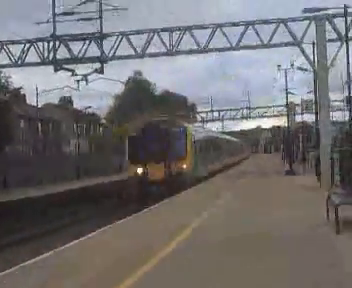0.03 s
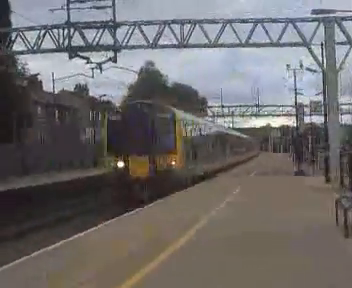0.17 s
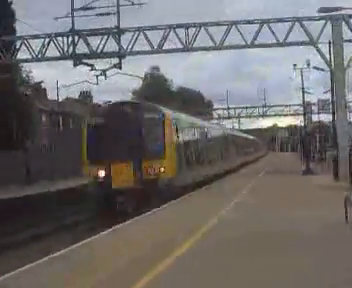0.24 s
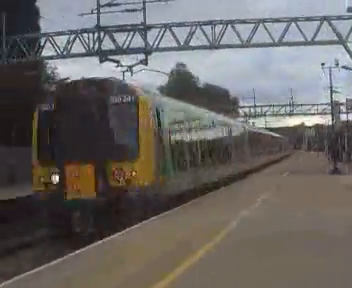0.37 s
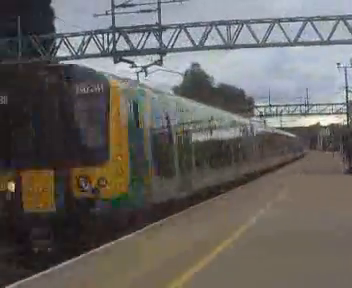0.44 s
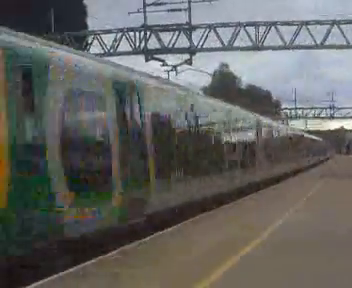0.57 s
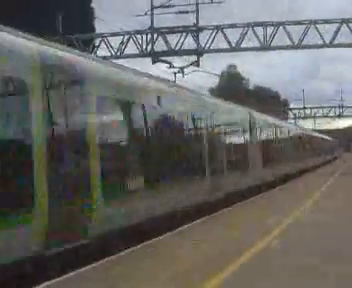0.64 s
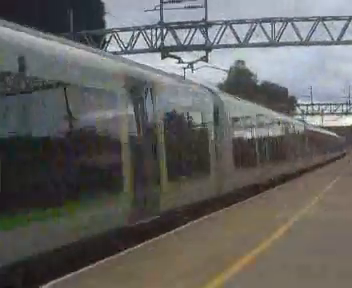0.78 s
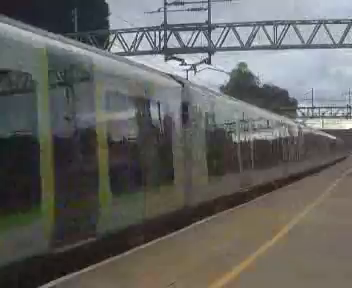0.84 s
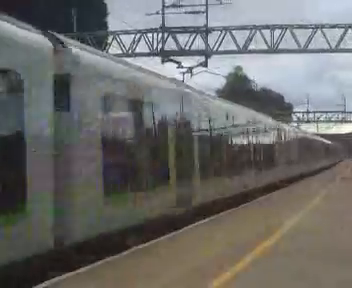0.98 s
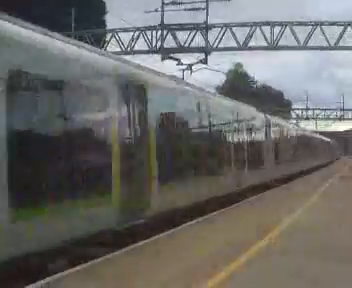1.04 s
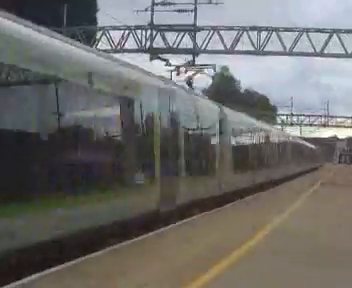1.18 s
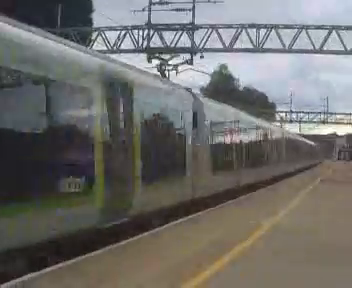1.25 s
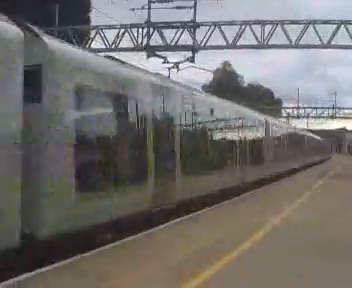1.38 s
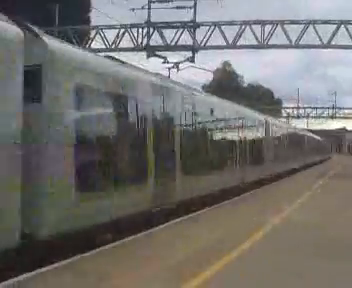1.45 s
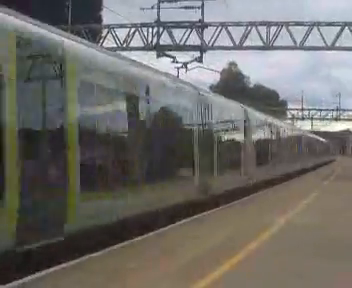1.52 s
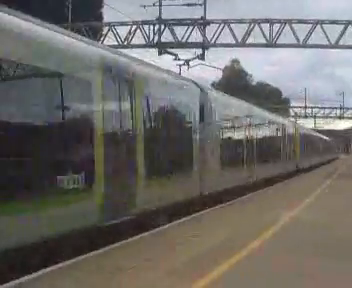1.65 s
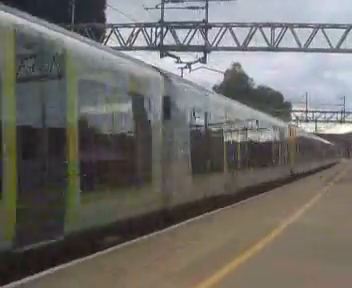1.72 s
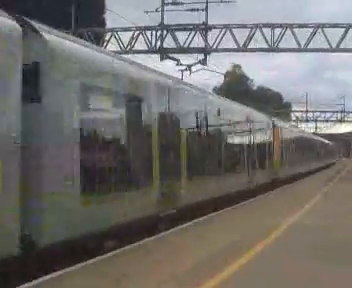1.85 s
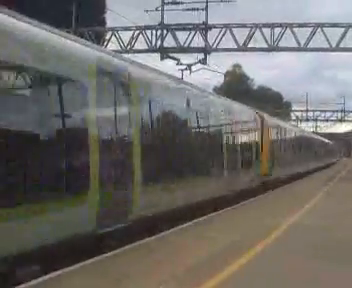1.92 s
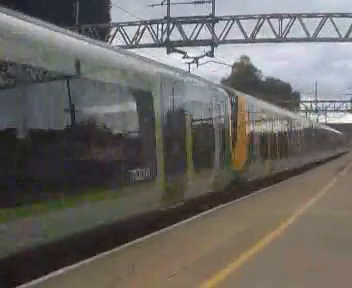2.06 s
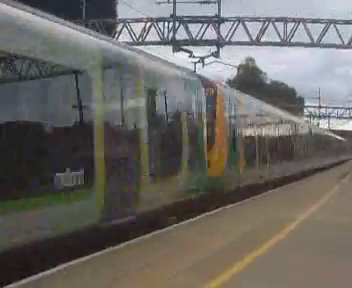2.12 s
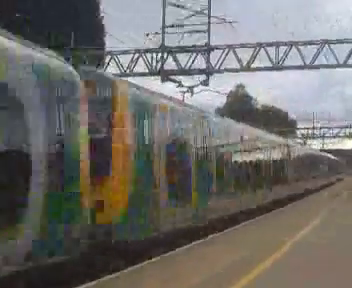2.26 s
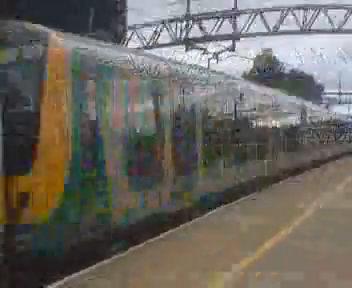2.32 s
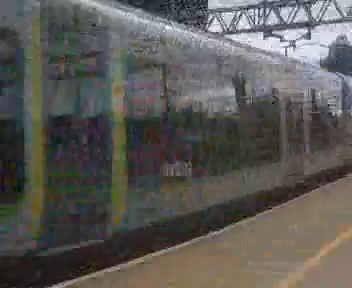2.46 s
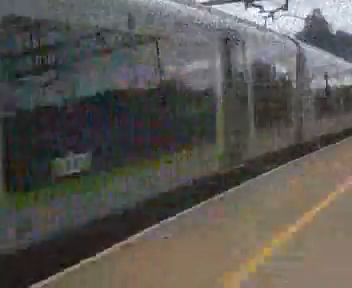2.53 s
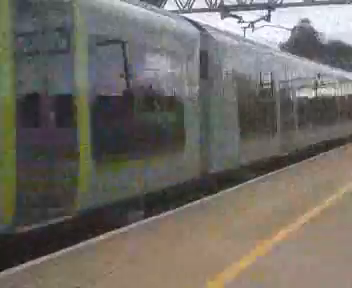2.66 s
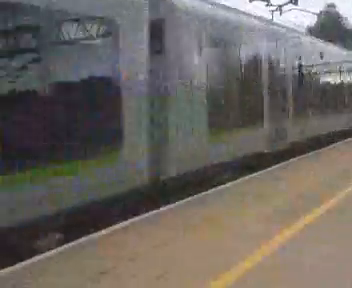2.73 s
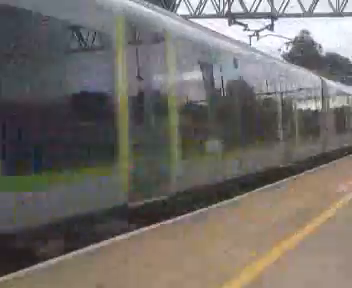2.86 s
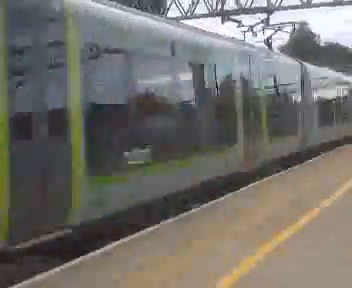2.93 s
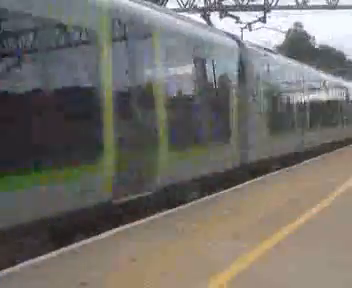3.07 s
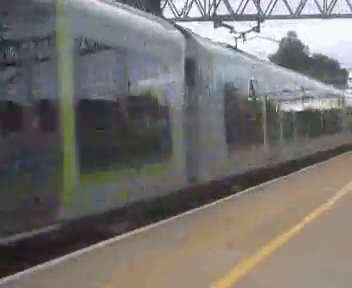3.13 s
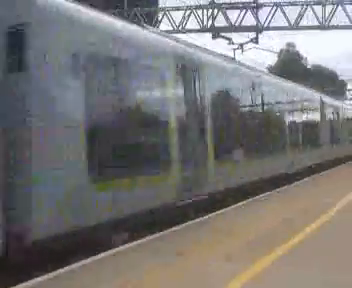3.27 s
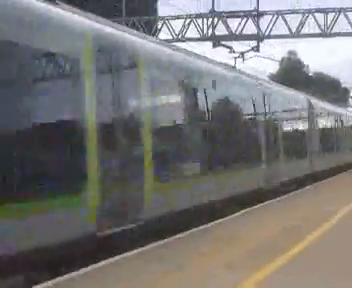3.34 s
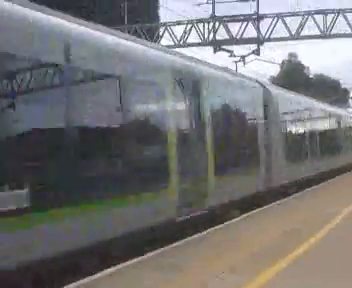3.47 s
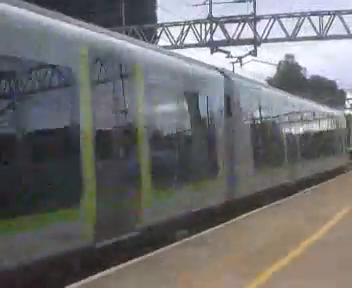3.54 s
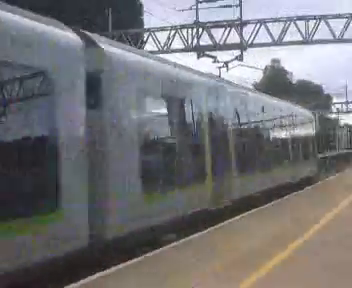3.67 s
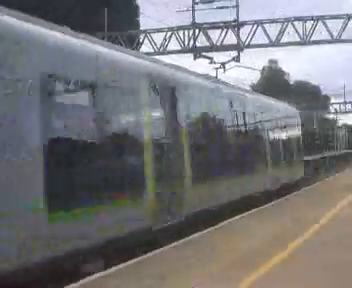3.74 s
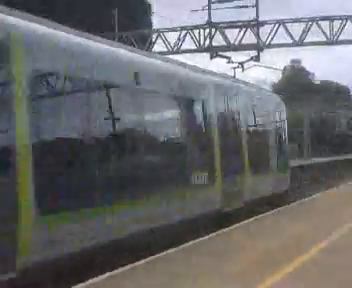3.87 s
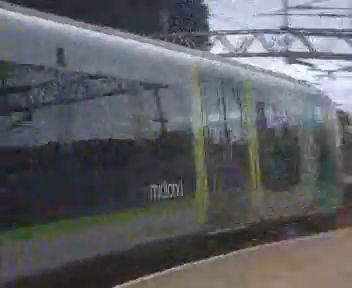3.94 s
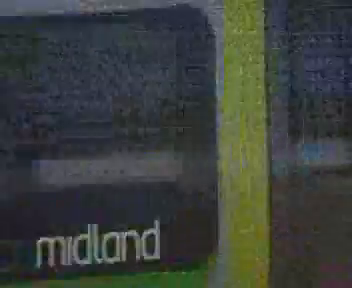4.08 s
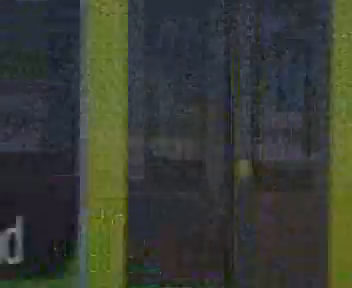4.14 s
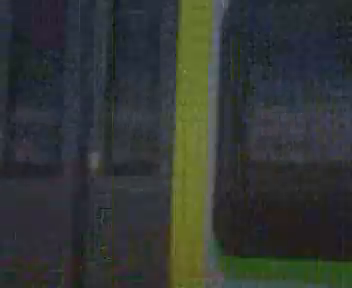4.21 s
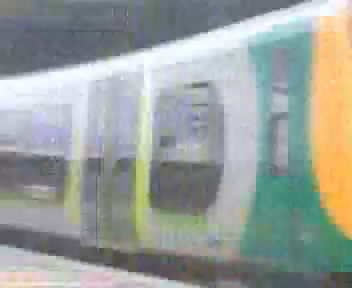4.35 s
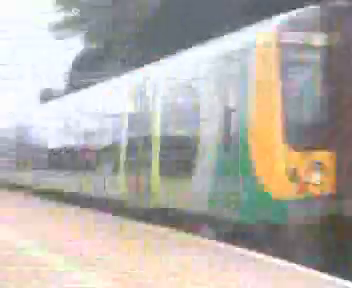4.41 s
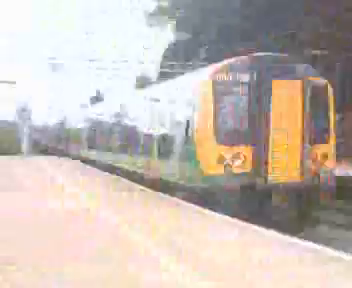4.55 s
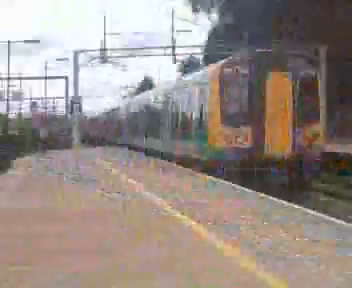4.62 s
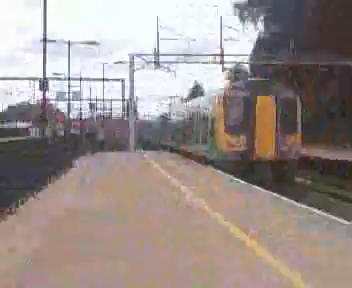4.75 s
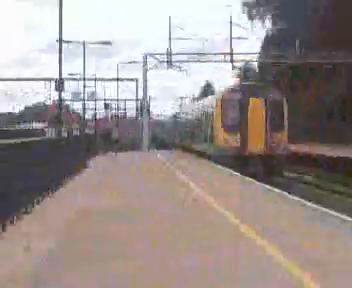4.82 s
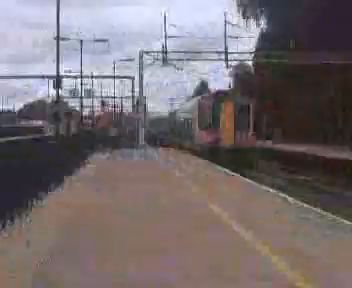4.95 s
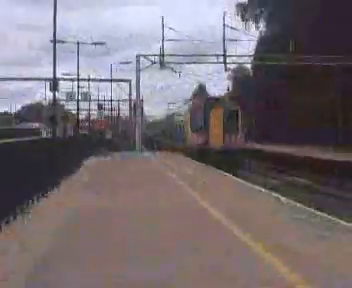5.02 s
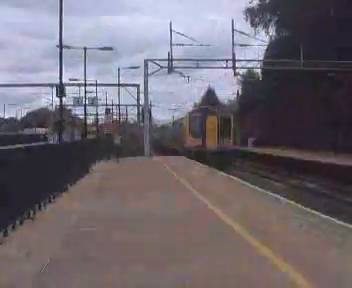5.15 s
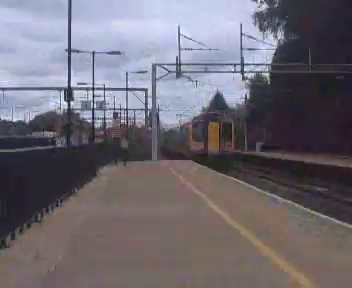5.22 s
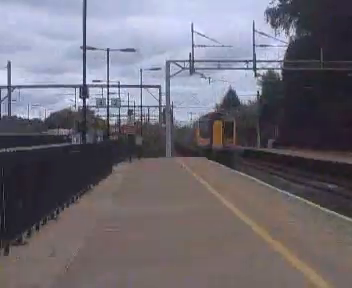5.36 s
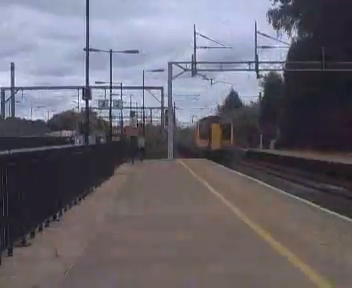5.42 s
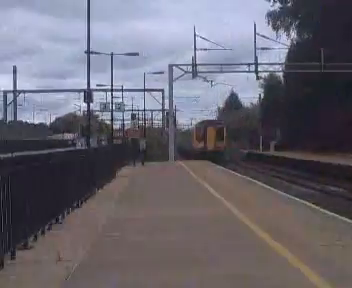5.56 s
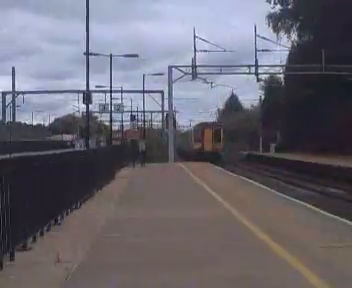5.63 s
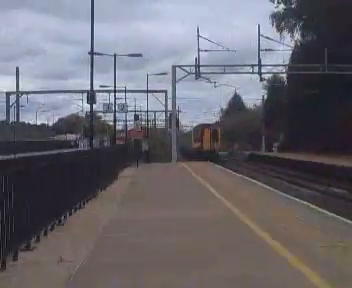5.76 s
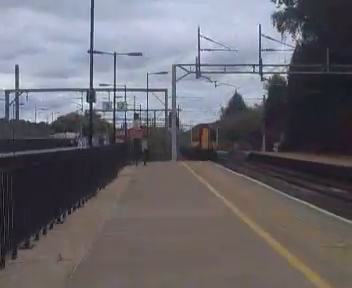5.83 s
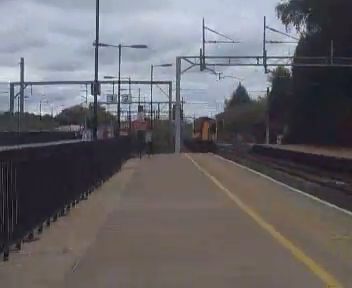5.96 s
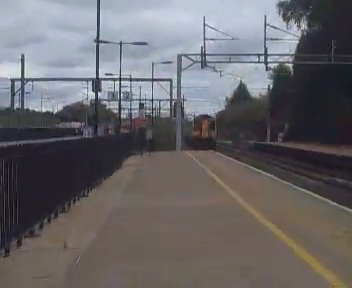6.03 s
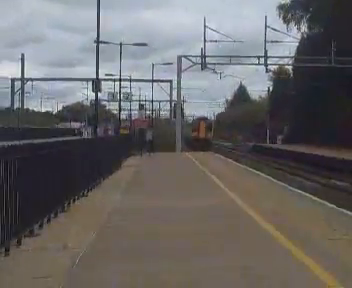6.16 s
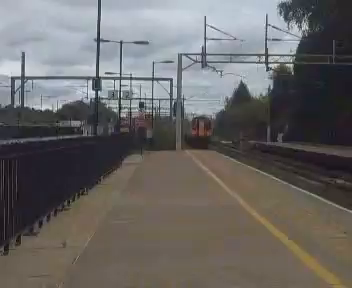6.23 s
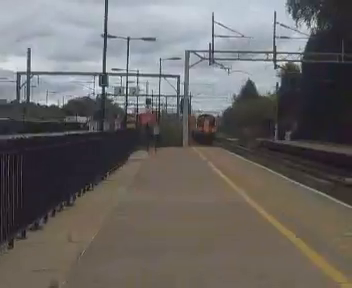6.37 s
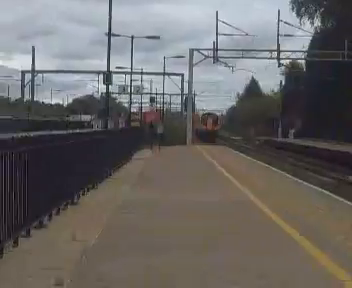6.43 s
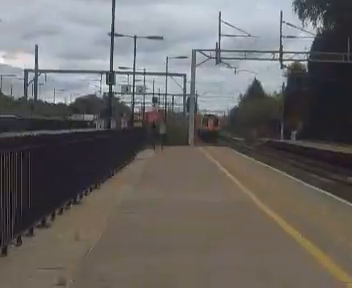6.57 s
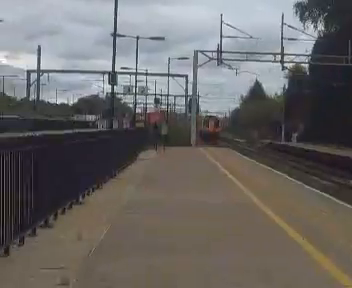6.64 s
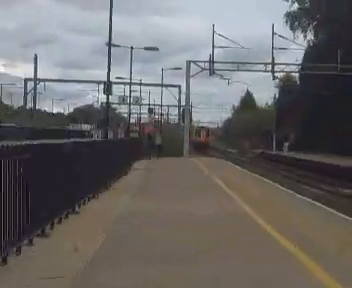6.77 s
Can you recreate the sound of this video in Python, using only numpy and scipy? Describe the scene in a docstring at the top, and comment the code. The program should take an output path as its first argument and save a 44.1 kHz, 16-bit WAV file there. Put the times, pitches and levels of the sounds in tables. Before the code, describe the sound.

From the first instant a fast electric train is close and loud at an open station: a high, blurred metallic ring around 2.4 kHz, hiss, rail drone and a mid-pitched motor whine. At about 0.5 s the front bursts past with a blast of low buffeting air and harsh microphone overload, until about 0.7 s; the whine drops away. From 0.8 to 4.2 s the cars stream by, ringing slightly lower and sagging, with uneven surges of wheel noise and hiss near 1.1, 1.6, 2.1, 2.5, 3.5 and 3.9 s, and faint narrow motor whines between. Around the join of the two units, near 2.5 s, there is another stronger surge. After about 4.3 s the tail is gone: the ring falls flat, near 1.8 kHz, clearer and fluttering, over a distant roar and a brief low rumble. It thins steadily, becoming faint by 6.8 s. The sound is narrow-band, with little high treble.

```python
"""An open station: a fast electric train of two coupled units runs through, a few metres from the listener.
Noise rings the steel wheels' modes: sharp while they come, flat once they have gone.
Bands of flickering noise make the rail drone, the air buffeting past each car, hiss, roar and rumble.
Narrow resonances make the motors' whine. A narrow-band microphone overloads on the loudest peaks.
"""
import sys
import numpy as np
from scipy import signal
from scipy.fft import rfft, irfft, next_fast_len
from scipy.io import wavfile
from scipy.ndimage import map_coordinates

SR = 44100
rng = np.random.default_rng(int(sys.argv[2]) if len(sys.argv) > 2 else 0)


def unload_audio(sound):
    """Save the sound as a 16-bit wav file, at the path given as the first command line argument."""
    columns = np.transpose(np.atleast_2d(sound))
    # keep every value between -1 and 1, then stretch to whole-number steps
    steps = np.round(np.clip(columns, -1, 1) * 32767)
    wavfile.write(sys.argv[1], SR, steps.astype(np.int16))


N = 299439

# Ways a wheel rings at rest, before blurring: pitch_hz, width_hz, level_db
WHEEL_MODES = [(1150, 59, -15), (1468, 72, -12), (2009.6, 38, 1), (2199, 84, 2), (2570, 300, -7.5),
               (2935, 560, -6.5)]
# The next six shape noise, by level in each Hz of pitch: pitch_hz, level_db
# Air pushed aside by the cars: pitch_hz, level_db
AIR_SPECTRUM = [(12, -53.5), (20, -30.5), (65, -14), (140, -9), (205, -9.5), (295, -7), (352, -3.5),
                (461, -7), (567, -7.5), (665, -3), (900, -8.5), (1170, -28.5), (1980, -120)]
# Droning rails: pitch_hz, level_db
RAIL_SPECTRUM = [(450, -17), (650, -13), (900, -6.5), (1250, -4.5), (1500, -4.5), (1800, -7), (2300, -1.5)]
# Hiss above the wheel ring: pitch_hz, level_db
HISS_SPECTRUM = [(2000, -20.5), (2600, -8), (3000, -3), (3300, 3), (3600, 5), (4000, 1), (4400, 0.5),
                 (5400, -5)]
# Distant roar; the dip is where the platform's reflection cancels the direct sound: pitch_hz, level_db
FAR_ROAR_SPECTRUM = [(450, -24.5), (700, -10), (900, 0.5), (1200, 0), (1380, -11), (1600, 0.5), (2100, -2),
                     (2600, 2), (3000, -22), (4000, -22)]
# Ground rumble: pitch_hz, level_db
RUMBLE_SPECTRUM = [(25, -16.5), (50, -4), (90, 6.5), (150, -6.5), (315, 7.5), (450, -17.5)]
# How strongly the microphone passes each pitch: pitch_hz, level_db
MICROPHONE_RESPONSE = [(3300, 0), (3600, -9), (3900, -17), (4250, -24), (4450, -36), (4600, -52),
                       (4690, -110)]
# The whole train, between the bogies (wheel sets):
# start_s, wheels_coming_db, wheels_alongside_db, rail_drone_db, buffeting_db, hiss_db
TRAIN_LEVELS = [(0.0, -11, -20.5, -21, -25, -17.5), (0.15, -11.5, -26, -26, -24.5, -21),
                (0.42, -10, -26, -15, -23.5, -14.5), (0.78, -17.5, -16, -21, -25.5, -19),
                (1.0, -25.5, -15, -23.5, -45, -22), (1.45, -24, -16.5, -34.5, -35.5, -23),
                (1.9, -23.5, -24.5, -27, -39, -21.5), (2.4, -33, -28, -31, -36.5, -36.5),
                (2.85, -29.5, -25.5, -29.5, -38, -32), (3.2, -36.5, -23, -41.5, -46, -40),
                (3.36, -50.5, -22, -37, -40, -34.5), (3.75, -34.5, -26, -27.5, -41, -27),
                (4.3, -21.5, -22.5, -36, -42, -33), (4.5, -59.5, -25, -35, -42, -34),
                (4.9, -82, -31, -46, -50, -36.5), (5.1, -90.5, -63, -82, -58, -46),
                (6.07, -92.5, -94, -95, -59.5, -50), (6.79, -90, -90.5, -89, -58.5, -58)]
# Bogies and car gaps level with the listener:
# start_s, held_s, wheels_coming_db, wheels_alongside_db, rail_drone_db, buffeting_db, hiss_db
BOGIE_PASSES = [(0.498, .2, -15, -14.5, -12, -17.5, -10), (0.84, 0.031, -23, -15, -31, -26, -19),
                (1.089, 0.072, -19, -18, -24, -25.5, -19.5), (1.189, 0.022, -19, -17.5, -29, -33.5, -20),
                (1.32, 0.036, -27, -19.5, -28, -32, -18.5), (1.599, 0.14, -19.5, -18.5, -36.5, -33, -19.5),
                (1.981, 0.013, -21.5, -27.5, -38, -42, -23.5), (2.119, 0.17, -22, -21, -37.5, -51, -21.5),
                (2.42, 0.11, -23.5, -27.5, -30.5, -31.5, -34.5),
                (2.51, 0.18, -18.5, -18.5, -29.5, -38.5, -20.5), (2.95, 0.073, -26.5, -23.5, -45, -34, -24),
                (3.13, 0.017, -28.5, -23, -52, -57, -24), (3.499, 0.11, -25, -22, -41.5, -38, -18.5),
                (3.902, 0.055, -14.5, -20.5, -23, -30.5, -19.5), (4.04, .05, -20, -18.5, -37.5, -33, -18),
                (4.249, 0.05, -34, -31, -25.5, -33, -32)]
# How fast each layer rises as a bogie nears, all in db_per_s:
# wheels_coming, wheels_alongside, rail_drone, buffeting, hiss
BOGIE_RISE = (118.6, 88.2, 101, 130, 150)
# How fast each layer falls afterwards, same columns, in db_per_s
BOGIE_FALL = (134, 80, 111, 160, 150)
# How much later each layer peaks (negative is earlier), same columns, in s
BOGIE_LAG = (-0.0054, .04, -0.0066, -.005, .015)
# Traction motors going by: start_s, held_s, level_db
MOTOR_PASSES = [(1.0, .05, -28), (1.499, 0.021, -33), (1.92, 0.038, -34), (2.41, .03, -32.5),
                (2.899, 0.03, -43), (3.301, 0.033, -35.5), (3.892, 0.034, -34), (4.26, 0.032, -35.5)]
# The tail drawing away: start_s, wheels_db, distant_roar_db, ground_rumble_db
LEAVING_LEVELS = [(4.32, -28, -28.5, -43), (4.7, -28, -31, -53), (4.95, -30.5, -34, -61),
                  (5.15, -33.5, -39.5, -74), (5.7, -36, -44, -82), (6.1, -40, -44.5, -69),
                  (6.3, -44.5, -46, -71), (6.4, -51.5, -46, -77), (6.79, -47.5, -48, -77)]

MACH = .138   # train speed over the speed of sound
MAIN_RING_HZ = 2100   # middle of the strongest wheel modes at rest
COMING_HZ, ALONGSIDE_HZ = 2428.5, 2087   # where that ring is heard, before it wanders
ALONGSIDE_SAG_HZ_PER_S = 28   # the ring sags as more cars draw away
WANDER_HZ, WANDER_RATE_HZ = 15, 6   # the ring wanders as wheels take turns
TAIL_FLUTTER_DB, TAIL_FLUTTER_RATE_HZ = 1.05, 16   # far sound flutters in the stirred air
OVERLOAD = .71   # largest wave height the microphone can carry
CUTOFF_HZ = 16100
STEP = 40   # slow changes are worked out at every 40th sample


def from_db(db):
    """Turn decibels into a gain."""
    return 10 ** (np.asarray(db) / 20)


def rms_one(x):
    """Scale a sound to an average strength (rms) of 1."""
    return x / np.sqrt(np.mean(x ** 2) + 1e-20)


def gains_in_time(rows, fade_s=0.28):
    """Join the dB points in each column by straight lines, fade beyond both ends, and turn into gains."""
    start_s, *columns = np.transpose(rows)
    t = np.arange(N) / SR
    wide_s = np.r_[start_s[0] - fade_s, start_s, start_s[-1] + fade_s]
    return [from_db(np.interp(t, wide_s, np.r_[-90, level_db, -90])) for level_db in columns]


def shaped(x, points):
    """Make each pitch louder or softer by a table of pitch and dB."""
    size = next_fast_len(N)   # a length that transforms quickly
    hz = np.maximum(np.fft.rfftfreq(size, 1 / SR), 1)
    at_hz, level_db = np.transpose(points)
    gain = from_db(np.interp(np.log(hz), np.log(at_hz), level_db))
    return irfft(rfft(x, size) * gain, size)[:N]


def drift(rate_hz):
    """Slow random wandering of spread 1: noise smoothed twice by the same low-pass."""
    r = np.exp(-2 * np.pi * rate_hz * STEP / SR)
    noise = rng.standard_normal(N // STEP + 2002)
    slow = signal.lfilter([1], [1, -2 * r, r * r], noise)[2000:]   # skip the settling
    return np.interp(np.arange(N) / STEP, np.arange(len(slow)), rms_one(slow))


def resonance(hz, width_hz):
    """Noise shaking one resonance, which rings near its own pitch; rms 1."""
    r = np.exp(-np.pi * width_hz / SR)
    ringing = [1, -2 * r * np.cos(2 * np.pi * hz / SR), r * r]
    return rms_one(signal.lfilter([1, 0, -1], ringing, rng.standard_normal(N)))


def rush(spectrum, patchy_db, flicker_rate_hz):
    """Roughly third-octave bands of noise that swell partly together, partly each on its own; rms 1."""
    low, high = spectrum[0][0], spectrum[-1][0]
    edges = np.geomspace(low, high, int(3 * np.log2(high / low)) + 2)
    white = rng.standard_normal((2, N))   # neighbouring bands take turns with two noises
    together = drift(flicker_rate_hz)
    out = 0
    for k, band in enumerate(zip(edges, edges[1:])):
        band_filter = signal.butter(2, band, "band", fs=SR, output="sos")
        noise = signal.sosfilt(band_filter, white[k % 2])
        out = out + noise * from_db(patchy_db * (0.53 * together + drift(flicker_rate_hz)))
    return rms_one(shaped(out, spectrum))


def swell(start_s, held_s, level_db, rise_db_per_s, fall_db_per_s):
    """Power of a level that climbs, holds and falls, at every 40th sample."""
    t = np.arange(0, N, STEP) / SR
    before_db = rise_db_per_s * np.maximum(start_s - t, 0)
    after_db = fall_db_per_s * np.maximum(t - start_s - held_s, 0)
    return from_db(level_db - before_db - after_db) ** 2


def to_gain(power):
    """Turn power at every 40th sample into a gain at every sample."""
    return np.interp(np.arange(N), np.arange(0, N, STEP), np.sqrt(power))


def passing_gains():
    """Gains of the five near layers: the whole train plus each bogie, added as powers."""
    gains = []
    for k, whole in enumerate(gains_in_time(TRAIN_LEVELS)):
        bogies = sum(swell(start_s + BOGIE_LAG[k], held_s, levels_db[k], BOGIE_RISE[k], BOGIE_FALL[k])
                     for start_s, held_s, *levels_db in BOGIE_PASSES)
        gains.append(np.hypot(whole, to_gain(bogies)))
    return gains


def wheels(doppler, blur, patchy_db):
    """Rail roughness keeps the wheels ringing; motion plays the ring faster or slower (Doppler)."""
    ring = 0
    for hz, width_hz, level_db in WHEEL_MODES:
        gain = from_db(level_db + patchy_db * drift(11.8))
        ring = ring + gain * resonance(hz, width_hz * blur)
    place = np.cumsum(doppler * np.ones(N))   # reading place in the ring, in samples
    return rms_one(map_coordinates(ring, [place], order=3, mode="mirror"))


def wheels_coming():
    """Approach squeezes the waves, so the ring is sharp; many wheels at slightly different angles blur it."""
    ring_hz = COMING_HZ + WANDER_HZ * drift(WANDER_RATE_HZ)
    return wheels(ring_hz / MAIN_RING_HZ, blur=2.9, patchy_db=1.0)


def wheels_alongside():
    """Blurred wheels beside the listener, sagging in pitch as more cars draw away."""
    sag_hz = ALONGSIDE_SAG_HZ_PER_S * np.arange(N) / SR
    ring_hz = ALONGSIDE_HZ - sag_hz + WANDER_HZ * drift(WANDER_RATE_HZ)
    return wheels(ring_hz / MAIN_RING_HZ, blur=2.98, patchy_db=1.92)


def rail_drone():
    """The rails drone as slowly flickering noise."""
    return rush(RAIL_SPECTRUM, patchy_db=2.8, flicker_rate_hz=4.9)


def motor_coming():
    """The first car's whine, a resonance heard sharper until the car is level, then dropping fast."""
    power = swell(0, held_s=.5, level_db=-23, rise_db_per_s=0, fall_db_per_s=255)
    return to_gain(power) * resonance(1547, width_hz=77)


def air_buffeting():
    """Air buffets past each car as mostly low, uneven noise."""
    return rush(AIR_SPECTRUM, patchy_db=1.7, flicker_rate_hz=13)


def hiss():
    """High noise with a quick flicker."""
    return rush(HISS_SPECTRUM, patchy_db=2.5, flicker_rate_hz=24)


def motors_passing():
    """Each traction motor whines as it goes by: one narrow resonance, swelling and fading."""
    power = sum(swell(*row, rise_db_per_s=92, fall_db_per_s=76) for row in MOTOR_PASSES)
    return to_gain(power) * resonance(1388, width_hz=7)


def wheels_leaving():
    """Drawing away stretches the waves, so the ring is flat; it is also less blurred."""
    return wheels(1 / (1 + MACH), blur=1.1, patchy_db=0.9)


def distant_roar():
    """The departing train's roar, with the dip left by the platform's reflection."""
    return rush(FAR_ROAR_SPECTRUM, patchy_db=1.2, flicker_rate_hz=12)


def ground_rumble():
    """Low, fairly even noise in the ground."""
    return rush(RUMBLE_SPECTRUM, patchy_db=0.5, flicker_rate_hz=6)


def scene():
    """Add up the near layers, the motors and the tail drawing away."""
    coming, alongside, rail, buffeting, hiss_gain = passing_gains()
    leaving, roar, rumble = gains_in_time(LEAVING_LEVELS)
    flutter = from_db(TAIL_FLUTTER_DB * drift(TAIL_FLUTTER_RATE_HZ))
    out = coming * wheels_coming()
    out += alongside * wheels_alongside()
    out += rail * rail_drone()
    out += motor_coming()
    out += buffeting * air_buffeting()
    out += hiss_gain * hiss()
    out += motors_passing()
    out += leaving * flutter * wheels_leaving()
    out += roar * flutter * distant_roar()
    out += rumble * ground_rumble()
    return out[None]


def record(dry):
    """The narrow microphone band, then flat-topped overload that spits treble, then the top is cut."""
    narrow = shaped(dry[0], MICROPHONE_RESPONSE)
    clipped = np.clip(narrow, -OVERLOAD, OVERLOAD)
    top_cut = signal.cheby2(18, 45, CUTOFF_HZ, fs=SR, output="sos")
    return signal.sosfiltfilt(top_cut, clipped)[None]


dry = scene()
out = record(dry)
unload_audio(out)
```